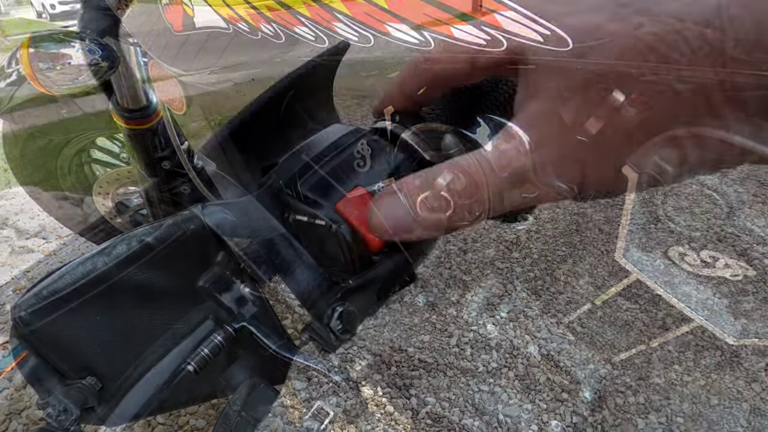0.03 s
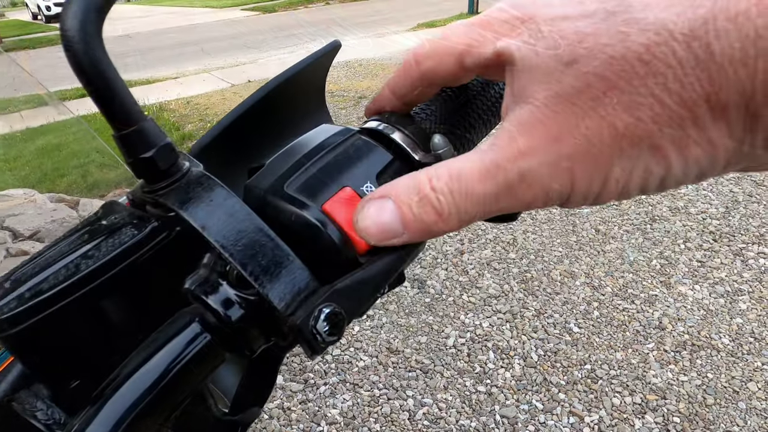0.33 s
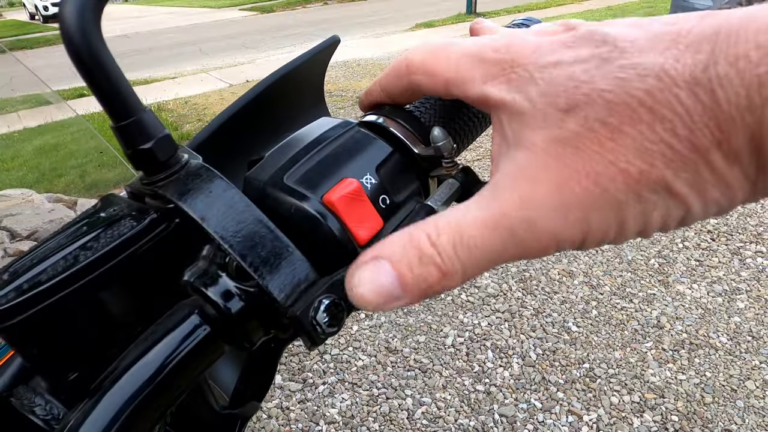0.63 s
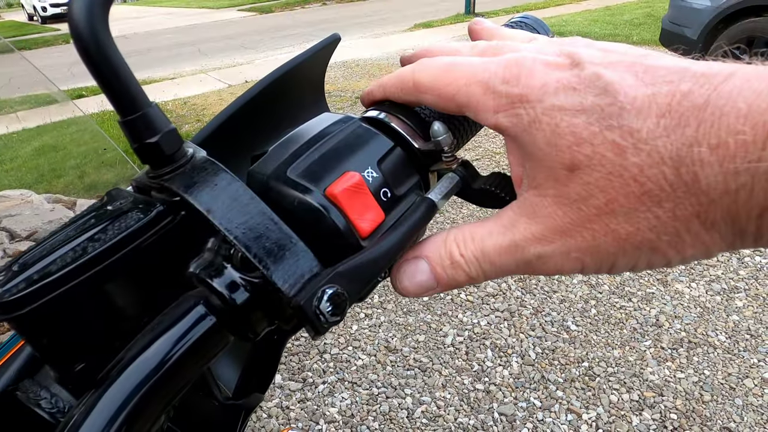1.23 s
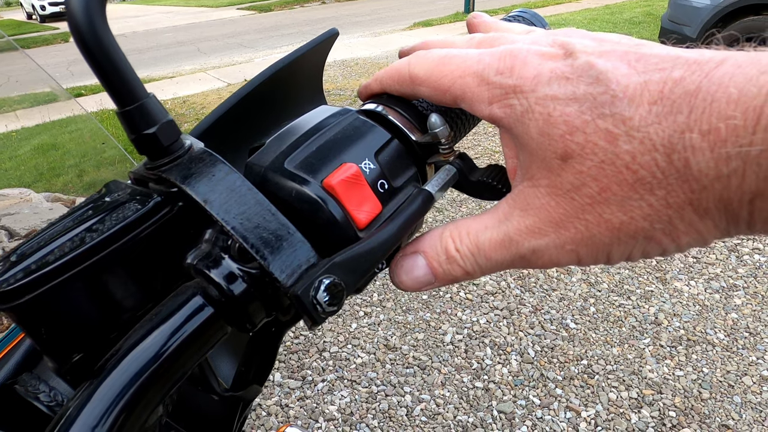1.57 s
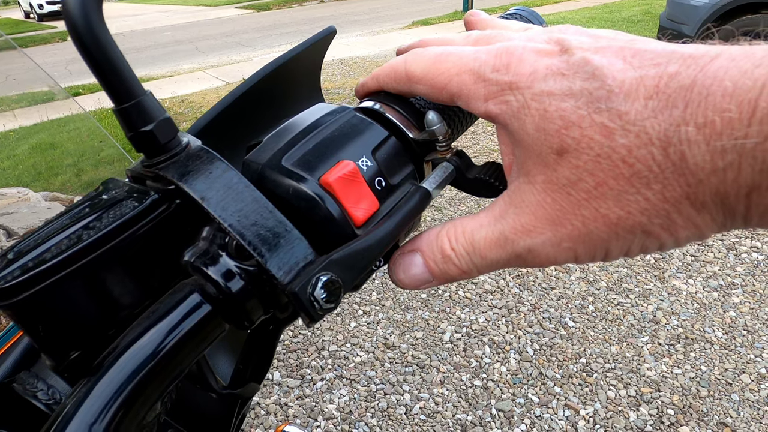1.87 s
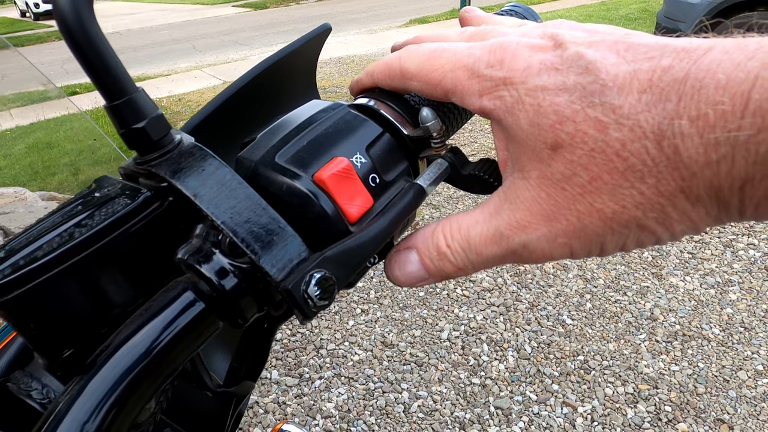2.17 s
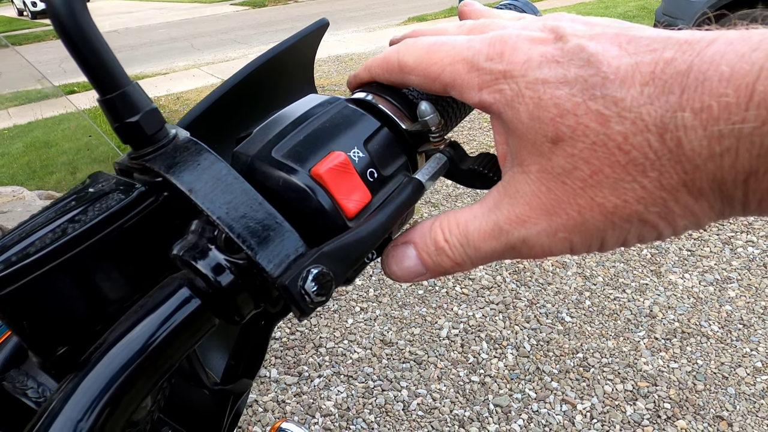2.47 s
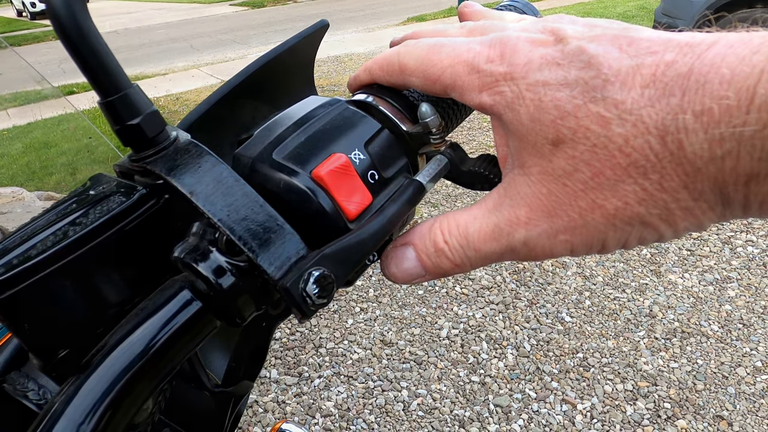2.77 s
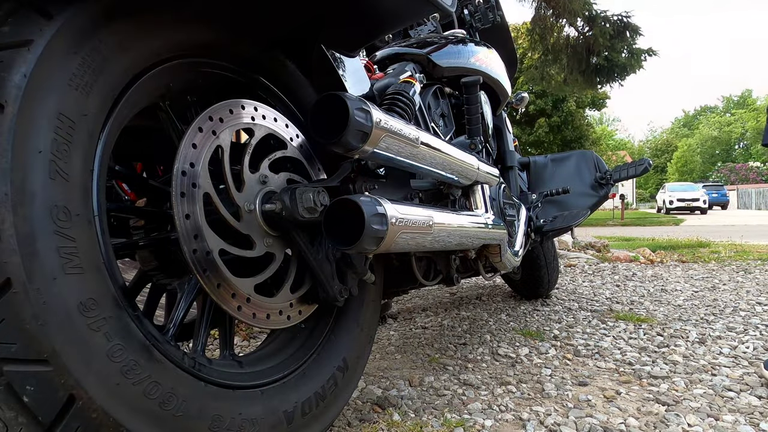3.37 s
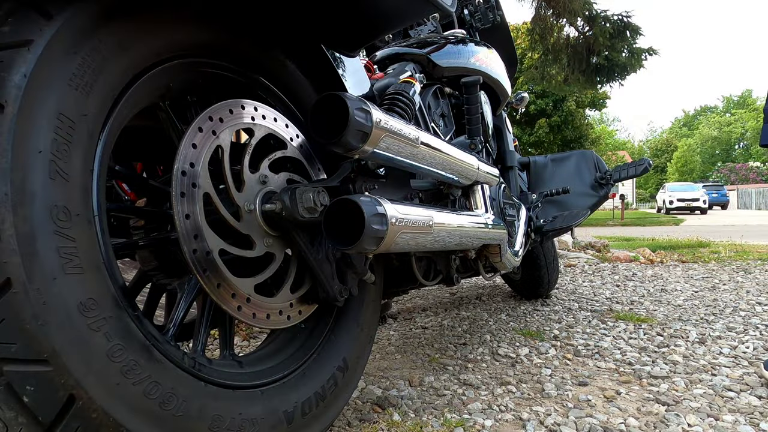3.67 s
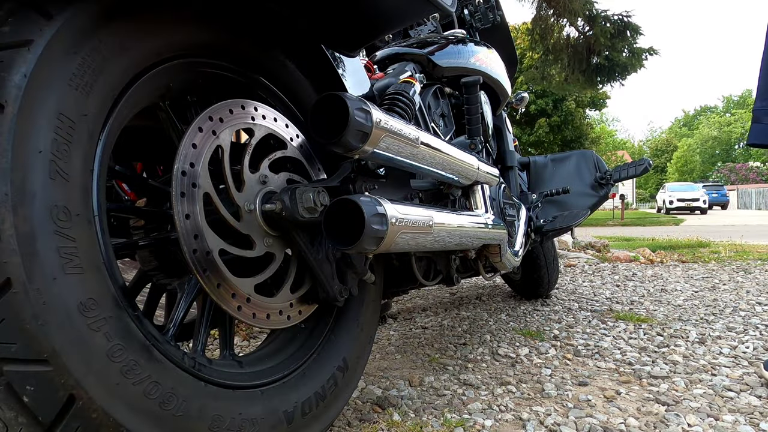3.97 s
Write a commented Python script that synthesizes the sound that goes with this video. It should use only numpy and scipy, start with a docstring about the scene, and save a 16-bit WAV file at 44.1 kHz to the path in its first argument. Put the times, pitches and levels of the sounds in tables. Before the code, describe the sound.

A motorcycle is started near the microphone in the open air. After a crisp switch click, the fuel pump gives a thin, steady whine and stops. The starter cranks briefly, and the engine fires in deep, irregular exhaust beats.

```python
"""A V-twin motorcycle starts up outdoors. Its handlebar switch snaps on, ringing a plastic housing,
and the electric fuel pump whines for two seconds. The starter gears grind through four compressions
while unburnt charges puff from the pipes. Then the engine catches with nine uneven, slightly
overloaded bangs, each a crack, a pipe boom and a hiss of gas. Wind rumbles and a far bird calls."""
import sys
import numpy as np
from scipy import signal
from scipy.fft import rfft, irfft
from scipy.io import wavfile
from scipy.ndimage import uniform_filter1d

SR = 44100
rng = np.random.default_rng(int(sys.argv[2]) if len(sys.argv) > 2 else 0)


def log_audio(samples):
    """Write samples as a 16-bit WAV file to the path given in sys.argv[1]."""
    # one column per channel
    frames = np.atleast_2d(samples).T
    # limit to full scale, then quantise
    limited = np.clip(frames, -1, 1)
    pcm = np.round(limited * 32767).astype(np.int16)
    wavfile.write(sys.argv[1], SR, pcm)


N = 176400
T = np.arange(N) / SR


def from_db(db):
    """Decibels to gain."""
    return 10 ** (np.asarray(db) / 20)


def unit_rms(x):
    """Scale to rms 1."""
    return x / np.sqrt(np.mean(x ** 2) + 1e-20)


def automation(rows):
    """Straight ramps between timed breakpoints, one curve per value column."""
    times, *columns = np.transpose(rows)
    return [np.interp(T, times, column) for column in columns]


def eq_gain(spectrum, hz):
    """Gain of an EQ curve at the given frequencies."""
    points_hz, db = np.transpose(spectrum)
    return from_db(np.interp(np.log(hz + 1e-9), np.log(points_hz), db))


def noise(spectrum):
    """Steady noise coloured by an EQ curve, rolled off below its first point; rms 1."""
    hz = np.arange(N // 2 + 1) * SR / N
    low_cut = np.minimum(hz / spectrum[0][0], 1) ** 2
    return unit_rms(irfft(rfft(rng.standard_normal(N)) * eq_gain(spectrum, hz) * low_cut, N))


def lowpass(x, hz):
    """Second-order low-pass."""
    return signal.sosfilt(signal.butter(2, hz, fs=SR, output="sos"), x + 1e-18)


def drift(hz):
    """Random modulation, mostly slower than hz; rms 1."""
    return unit_rms(lowpass(rng.standard_normal(N + SR), hz)[SR:])


def decay(start, t60):
    """Envelope with an instant attack and an exponential tail."""
    return (T >= start) * from_db(-60 * np.clip((T - start) / t60, 0, 4))


def ring(start, modes, ratio=1, wave=np.cos):
    """Damped modes struck together, transposed by ratio."""
    age = T[T >= start][:SR] - start
    out, first = np.zeros(N), np.sum(T < start)
    for hz, db, t60 in modes:
        envelope = from_db(db) * np.exp(-np.log(1000) * age / t60)
        out[first:first + len(age)] += envelope * wave(2 * np.pi * hz * ratio * age)
    return out


# colours of the wind rumble and the distant hush: (frequency [Hz], relative level [dB])
WIND_EQ = [(25, 12), (45, 0), (70, -12.5), (130, -18), (250, -31.5), (600, -58), (3000, -87.5)]
HUSH_EQ = [(150, 0), (400, 0.5), (900, 0.5), (1600, -7.5), (2800, -13.5), (6000, -14.5), (15000, -33.5)]
# rise and fall of the wind: (time [s], level [dB])
WIND_LEVEL = [(0, -19.5), (.15, -41.5), (.3, -37), (.8, -43.5), (1.8, -51.5), (4, -36)]


def outdoor_air():
    """The ambience bed: low, swaying wind over a steady far-off hush."""
    gusts = from_db(automation(WIND_LEVEL)[0] - drift(hz=4.1))
    return gusts * noise(WIND_EQ) + from_db(-67) * noise(HUSH_EQ)


# partials of the thin whine: (frequency [Hz], level [dB])
WHINE_PARTIALS = [(3997, -85), (5995, -82), (7995, -74), (9990, -77), (11990, -83.5)]


def thin_whine(end_s=0.59):
    """A barely audible high whine holds its pitch and fades just after the switch snaps."""
    fade = np.clip(1 - (T / end_s) ** 4, 0, 1)
    return fade * sum(from_db(db) * np.sin(2 * np.pi * hz * T) for hz, db in WHINE_PARTIALS)


# small ticks: (time [s], level [dB], t60 [s])
TICK_HITS = [(.295, -57.5, 0.073), (0.445, -49.5, 0.077), (.529, -49, 0.06), (0.694, -49.5, 0.081),
             (1.152, -50, 0.027), (2.2, -54, .02), (2.912, -38, 0.063)]
# their colour: (frequency [Hz], relative level [dB])
TICK_EQ = [(300, -37), (2000, 16), (4000, 14), (7500, 13), (11000, 5), (16000, -46.5)]


def ticks():
    """Switch, pump and starter relay tick lightly in short, bright bursts of noise."""
    return noise(TICK_EQ) * sum(from_db(db) * decay(start, t60) for start, db, t60 in TICK_HITS)


# bird notes: (time [s], length [s], start pitch [Hz], end pitch [Hz], level [dB])
BIRD_NOTES = [(.33, 0.082, 2500, 2280, -67), (.435, 0.1, 3430, 2820, -64), (.81, 0.12, 3100, 3490, -63),
              (.865, 0.035, 3160, 2700, -58), (1.43, 0.13, 3000, 2760, -52)]


def far_bird():
    """A distant bird whistles faint, gliding notes with a slight waver."""
    waver = 1 + 0.012 * drift(hz=140)
    song = np.zeros(N)
    for start, length, start_hz, end_hz, db in BIRD_NOTES:
        progress = np.clip((T - start) / length, 0, 1)
        hz = (start_hz + (end_hz - start_hz) * progress) * waver
        song += from_db(db) * np.sin(np.pi * progress) * np.sin(2 * np.pi * np.cumsum(hz) / SR)
    return song


# double hit of the switch contacts: (time [s], relative level [dB])
CONTACT_HITS = [(.4164, -15), (.4182, 0)]
# modes of the housing: (frequency [Hz], relative level [dB], t60 [s])
HOUSING_MODES = [(844, -47, .02), (1300, -47, .013), (2620, -39.5, 0.06), (3144, -25, 0.029),
                 (3800, -24.5, .012), (3830, -8.5, 0.0047), (4780, 2.5, 0.0071), (6830, -10.5, 0.013),
                 (7520, 1, .011), (8600, -7.5, 0.0031), (10700, -32, .009)]
# colour of the snap: (frequency [Hz], relative level [dB])
SNAP_EQ = [(700, 20.5), (1500, -23), (4000, 0), (8000, 13), (12000, 11.5), (15500, -38.5), (17000, -47)]


def switch(low_cut_hz=710):
    """The rocker snaps over with a crisp crack and rings its small plastic housing."""
    crack = noise(SNAP_EQ)
    snap = np.zeros(N)
    for start, db in CONTACT_HITS:
        transient = from_db(-15.5) * decay(start, t60=0.015)
        tail = from_db(-44) * decay(start, t60=0.12)
        snap += from_db(db) * (ring(start, HOUSING_MODES, wave=np.sin) + crack * (transient + tail))
    return signal.sosfilt(signal.butter(4, low_cut_hz, "high", fs=SR, output="sos"), snap + 1e-18)


# motor tones, paired in order: (frequency [multiple of shaft rate]) and (rms level [dB])
MOTOR_ORDERS = [1, 2, 3, 4, 5.7, 7.5, 8, 10, 12, 13, 16, 21, 24, 32, 46, 48, 93, 94]
MOTOR_LEVELS = [-63.5, -66, -71, -71.5, -69.5, -76, -56, -70.5, -60.5, -74.5, -64.5, -71.5, -72, -73.5, -80,
                -72, -68.5, -62.5]
# impeller whistle: (time [s], rms level [dB])
WHISTLE_LEVEL = [(0.6, -51), (0.62, -49), (0.67, -55.5), (0.81, -48), (1.47, -51), (1.6, -47),
                 (2.59, -47.5), (2.63, -51.5), (2.64, -55)]
# colours of the fuel's rush and its first gulp: (frequency [Hz], relative level [dB])
RUSH_EQ = [(60, -82), (200, 9), (450, 6), (750, 7), (1300, 10), (2000, 4), (2700, 8), (3600, 0), (5500, 0),
           (6600, -7), (9000, -2.5), (11500, 0), (15500, -4)]
GULP_EQ = [(100, 4), (250, -11), (1400, -2), (2500, -16), (5000, -35), (15000, -29)]


def fuel_pump(on_s=0.53, off_s=2.648, shaft_hz=122.55, sag_hz_per_s=0.27, vanes=47):
    """A small motor spins up, sags slightly as pressure builds and coasts down; fuel rushes through."""
    since_on, since_off = np.maximum(T - on_s, 0), np.maximum(T - off_s, 0)
    spin_up, coast = 1 - np.exp(-since_on / 0.02), np.exp(-since_off / 0.066)
    hz = (shaft_hz - sag_hz_per_s * since_on) * spin_up * coast
    wobble = 1 + 0.001 * drift(hz=26) + 0.036 * (since_off > 0) * drift(hz=240)
    angle = 2 * np.pi * np.cumsum(hz * wobble) / SR
    motor = sum(from_db(db + drift(hz=24)) * np.sin(order * angle)
                for order, db in zip(MOTOR_ORDERS, MOTOR_LEVELS))
    whistle = from_db(automation(WHISTLE_LEVEL)[0]) * np.exp(-since_off / 0.016) * np.sin(vanes * angle)
    attack, release = 1 - np.exp(-(since_on / 0.064) ** 2), np.exp(-since_off / 0.033)
    rush = from_db(-57) * noise(RUSH_EQ) * spin_up * np.exp(-since_off / 0.08)
    gulp = from_db(-41.5) * noise(GULP_EQ) * decay(on_s, t60=0.26)
    return np.sqrt(2) * attack * release * (motor + whistle) + rush + gulp


# grind of the starter gears: (time [s], mesh pitch [Hz], level [dB])
GEAR_GRIND = [(2.911, 592, -56), (2.945, 908, -44.5), (2.978, 1103, -34.5), (3.016, 991, -32),
              (3.036, 1048, -38), (3.06, 1101, -71.5), (3.12, 1730, -63), (3.138, 1688, -29),
              (3.165, 1503, -27.5), (3.182, 1271, -27.5), (3.204, 992, -26), (3.232, 1072, -57),
              (3.34, 1761, -51), (3.362, 1550, -21), (3.382, 1290, -25), (3.41, 1255, -48),
              (3.44, 1680, -77), (3.474, 1640, -35), (3.49, 1563, -19), (3.51, 1633, -72)]
# mesh harmonics, from the fundamental up: (relative level [dB])
MESH_HARMONICS = [8, -0.5, 5, 2.5, -2, -5, -5, -2]
# colours of the casing and the rattle: (frequency [Hz], relative level [dB])
CASING_EQ = [(300, -23), (900, -8), (1500, -6.5), (2100, 0.5), (2700, 8.5), (3200, -0.5), (3600, -0.5),
             (4500, -2), (5800, -14.5), (8200, -2.5), (10000, -9.5), (15500, -24)]
RATTLE_EQ = [(100, -9), (400, -1), (800, 6), (1500, 11), (2800, 2.5), (4400, 0), (6000, -10), (8000, -9),
             (11000, -12), (15500, -21)]
# clatter of the turning engine: (time [s], level [dB])
CLATTER_LEVEL = [(2.911, -44), (3.06, -44), (3.24, -40.5), (3.33, -39), (3.45, -36.5), (3.55, -49),
                 (3.64, -49), (3.74, -48.5), (3.83, -61), (4, -58)]


def starter(jitter=0.018, roughness_db=4.5, gear_rattle_db=-9.5):
    """The gears slow and grow loud against each compression, over the clatter of the turning engine."""
    mesh_hz, gear_db = automation(GEAR_GRIND)
    turning = T > GEAR_GRIND[0][0]
    load = from_db(gear_db) * turning * (T < GEAR_GRIND[-1][0])
    angle = 2 * np.pi * np.cumsum(mesh_hz * (1 + jitter * drift(hz=480))) / SR
    mesh = np.zeros(N)
    for harmonic, db in enumerate(MESH_HARMONICS, 1):
        rough_gain = from_db(db + roughness_db * drift(hz=300))
        mesh += eq_gain(CASING_EQ, harmonic * mesh_hz) * rough_gain * np.sin(harmonic * angle)
    clatter_gain = from_db(automation(CLATTER_LEVEL)[0]) * turning
    rattle = unit_rms(noise(RATTLE_EQ) * from_db(1.6 * drift(hz=180)))
    return load * unit_rms(mesh) + np.hypot(from_db(gear_rattle_db) * load, clatter_gain) * rattle


# early reflections of the starter: (delay [s], gain [dB])
REFLECTION_TAPS = [(.0023, -14.5), (.0071, -12), (0.018, -12)]


def with_reflections(direct):
    """The direct sound plus short echoes off the frame and the ground."""
    return direct + sum(from_db(db) * np.interp(T - delay, T, direct) for delay, db in REFLECTION_TAPS)


# unfired puffs: (time [s], relative level [dB], pipe pitch [ratio])
PUFF_HITS = [(3.1024, 7, 1), (3.261, 3, 1.12), (3.43, 8, 1.107), (3.62, 0.5, 1.2)]
# modes of the cold pipes: (base frequency [Hz], relative level [dB], t60 [s])
COLD_PIPE_MODES = [(59.67, -13.5, 0.54), (113, -14.5, 0.34), (198.5, -20, 0.07), (255, -25.5, 0.11)]
# colour of the breathy rush: (frequency [Hz], relative level [dB])
PUFF_EQ = [(100, -4), (210, 13.5), (310, -4), (600, -15), (1000, -22), (4000, -59)]


def exhaust_puffs(attack_s=0.0043, gas_db=-29):
    """Unburnt charges are pushed out softly, thumping the pipes' low modes with a dull rush of gas."""
    thump, outflow = np.zeros(N), np.zeros(N)
    for time, db, ratio in PUFF_HITS:
        start = time - attack_s
        attack = 1 - np.exp(-((T - start) / attack_s) ** 2)
        thump += from_db(db) * attack * ring(start, COLD_PIPE_MODES, ratio, np.sin)
        outflow += from_db(db + gas_db) * decay(time, t60=0.3)
    return noise(PUFF_EQ) * lowpass(outflow, hz=120) - lowpass(thump, hz=240)


# each cylinder's bangs: (time [s], boom gain [dB], pipe pitch [ratio], crack gain [dB], gas gain [dB])
FIRST_FIRINGS = [(3.5155, 9.5, .94, -8, -5), (3.659, 2, 1, -15.5, -19), (3.761, -0.5, 0.88, -12, -18.5),
                 (3.8542, 2, 0.94, -20, -19), (3.9345, 0, 0.96, -19, -15)]
SECOND_FIRINGS = [(3.5728, 3, .9, -10, -9), (3.802, 0.5, .97, -19, -13.5), (3.8865, 0.5, 1, -14, -14),
                  (3.9648, 1.5, 1.06, -20.5, -18)]
# modes of each cylinder's pipe: (base frequency [Hz], relative level [dB], t60 [s])
FIRST_PIPE_MODES = [(78, -26, 0.29), (136.8, -3, 0.071), (221.5, -10, 0.13), (286.6, -12.5, 0.11),
                    (388.4, -25, 0.23), (475, -31, 0.21), (652, -24.5, 0.14), (857, -29, 0.16)]
SECOND_PIPE_MODES = [(79.6, -3.5, 0.084), (157.4, -6.5, 0.15), (223.8, -2, 0.08), (253.1, -22, 0.3),
                     (378.4, -14.5, 0.12), (507, -29, 0.2), (642, -20, 0.09), (798, -32, 0.21)]
# colours of the crack and the gas hiss: (frequency [Hz], relative level [dB])
CRACK_EQ = [(300, 19), (900, -6.5), (2000, -3.5), (3700, 7), (5800, -13), (7700, -4.5), (10500, -19.5),
            (13300, -12.5), (16000, -25)]
GAS_EQ = [(200, 4), (450, 12), (800, 9.5), (1000, -2), (1250, 0), (2000, -4), (3400, -4), (5500, -25),
          (7800, -20.5), (11000, -27.5), (13300, -31), (16000, -45)]


def cylinder(firings, pipe_modes, muffle_hz=1010, crack_lead_s=0.00043, crack_width_s=0.00088):
    """Each firing is a short crack, a boom of the pipe, and gas that hisses in time with the boom."""
    pipe, crack_envelope, outflow = np.zeros((3, N))
    for start, boom_db, ratio, crack_db, gas_db in firings:
        pipe += from_db(boom_db) * ring(start, pipe_modes, ratio)
        spike = np.exp(-0.5 * ((T - start + crack_lead_s) / crack_width_s) ** 2)
        crack_envelope += from_db(crack_db) * spike
        outflow += from_db(gas_db) * decay(start, t60=0.075)
    boom = -lowpass(lowpass(pipe, muffle_hz), muffle_hz)
    boom_rms = np.sqrt(np.abs(uniform_filter1d(boom ** 2, size=600)) + 1e-9)
    pulsing = 0.14 + 0.86 * np.abs(boom) / boom_rms  # the hiss surges on every swing of the boom
    return boom + crack_envelope * noise(CRACK_EQ) + outflow * pulsing * noise(GAS_EQ)


def scene():
    """Mono mix: the motorcycle up close, over the outdoor bed."""
    background = outdoor_air() + thin_whine() + far_bird()
    priming = ticks() + switch() + fuel_pump()
    cranking = with_reflections(starter()) + exhaust_puffs()
    bangs = cylinder(FIRST_FIRINGS, FIRST_PIPE_MODES) + cylinder(SECOND_FIRINGS, SECOND_PIPE_MODES)
    return (background + priming + cranking + bangs)[None]


def record(dry, cutoff_hz=16200):
    """A soft clipper flattens the loudest peaks and a steep low-pass trims the top."""
    clipped = dry / (1 + dry ** 4) ** (1 / 4)
    return signal.sosfilt(signal.ellip(10, 0.1, 90, cutoff_hz, fs=SR, output="sos"), clipped)


dry = scene()
out = record(dry)
log_audio(out)
```